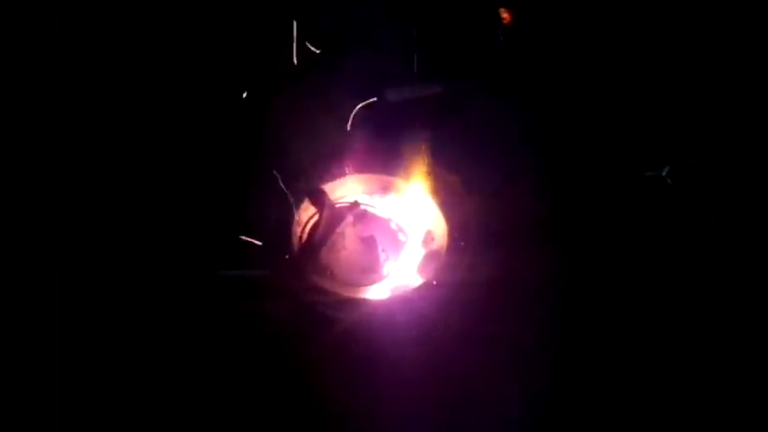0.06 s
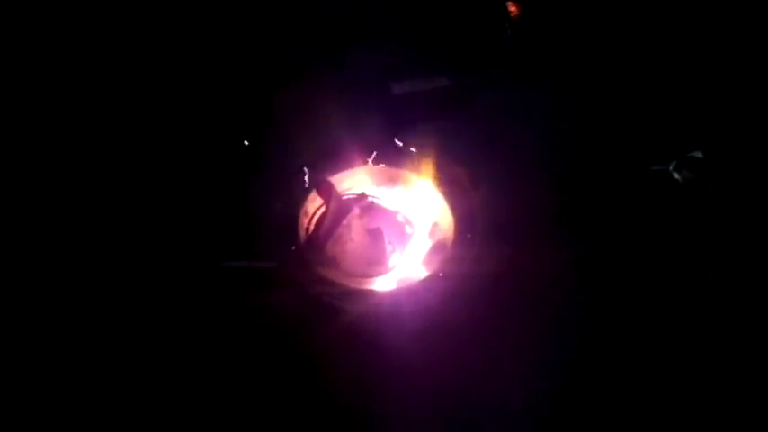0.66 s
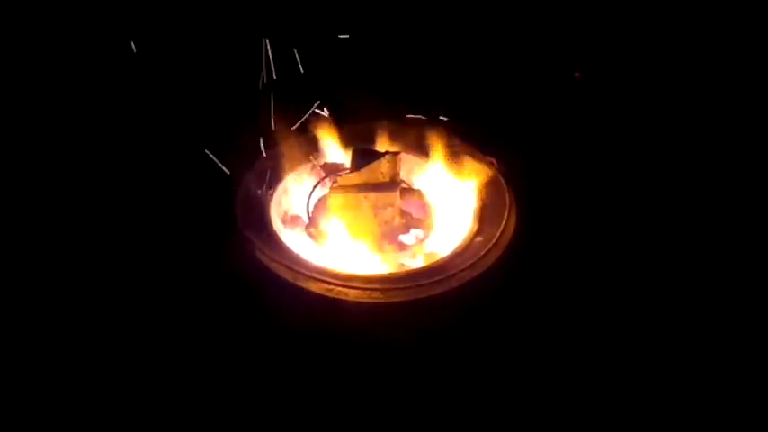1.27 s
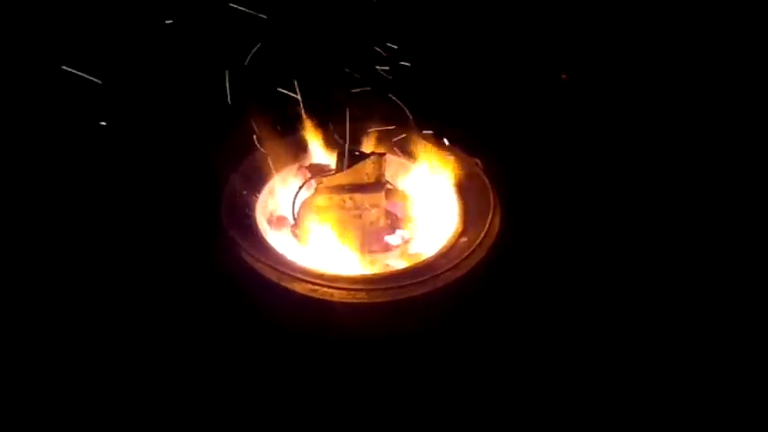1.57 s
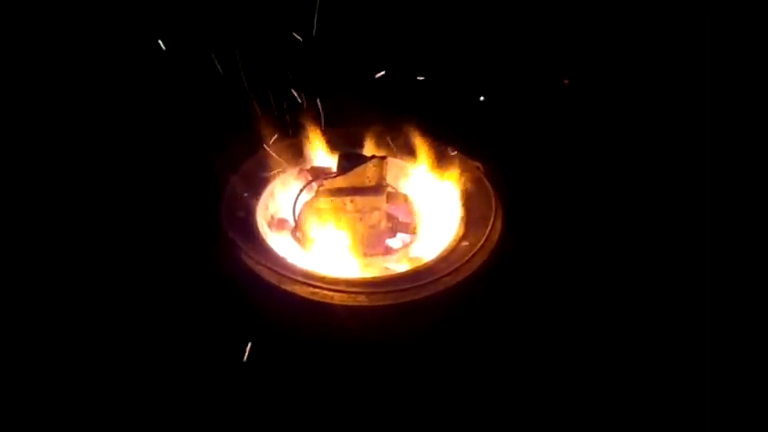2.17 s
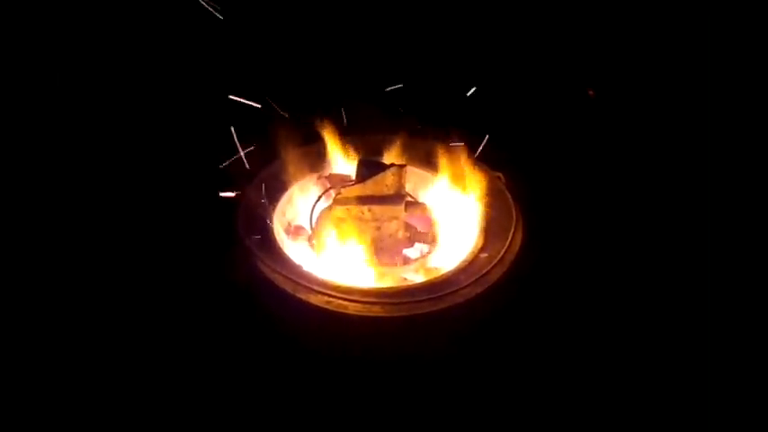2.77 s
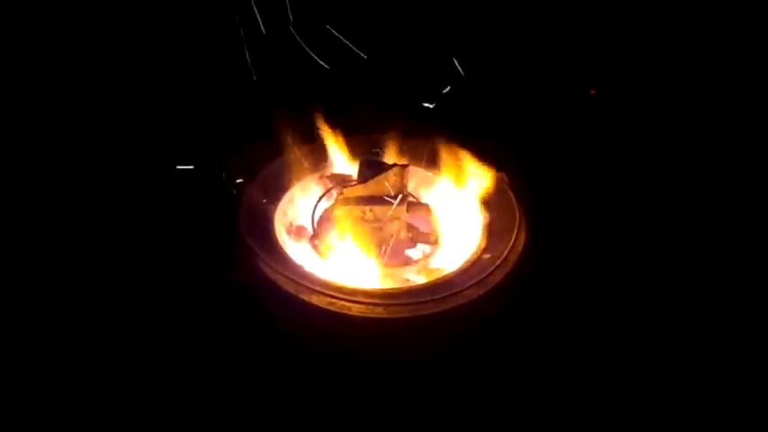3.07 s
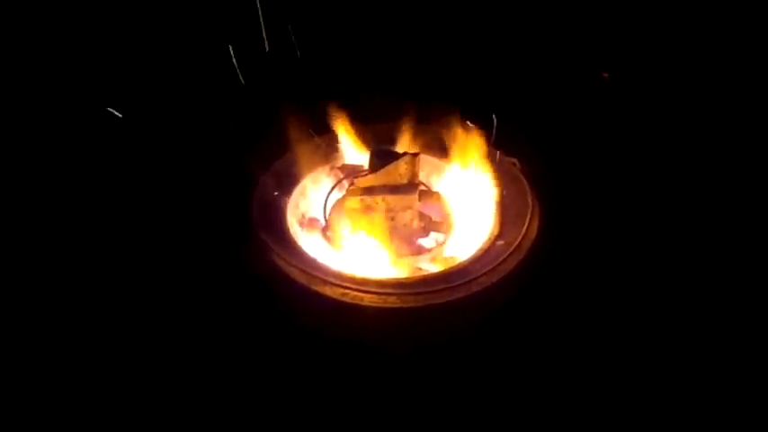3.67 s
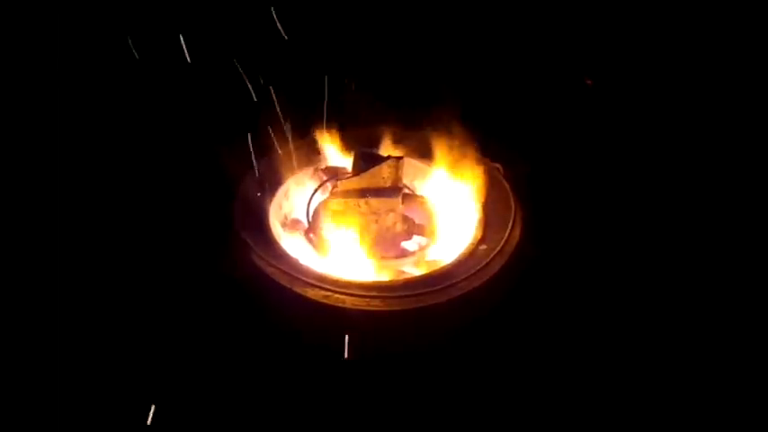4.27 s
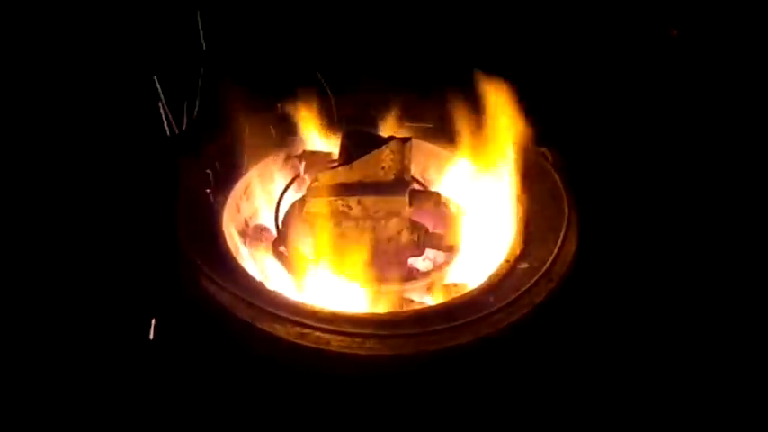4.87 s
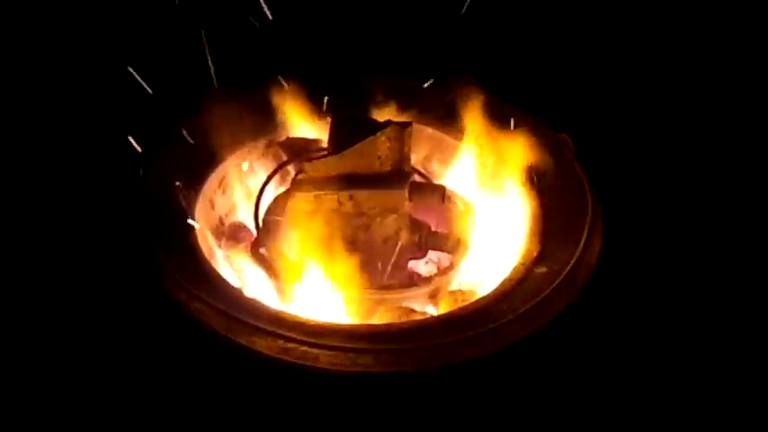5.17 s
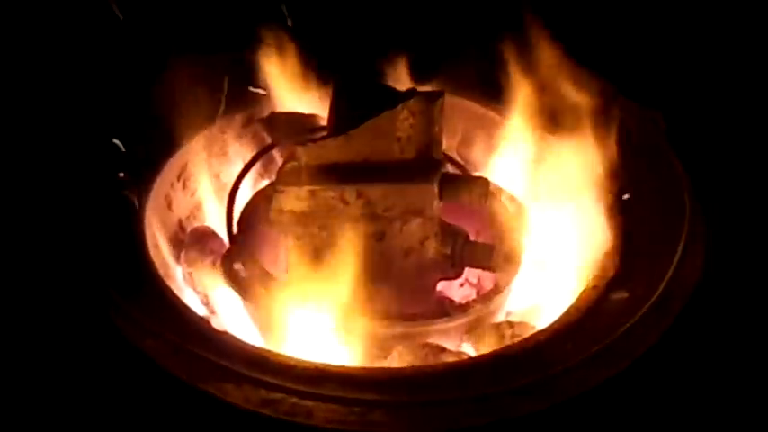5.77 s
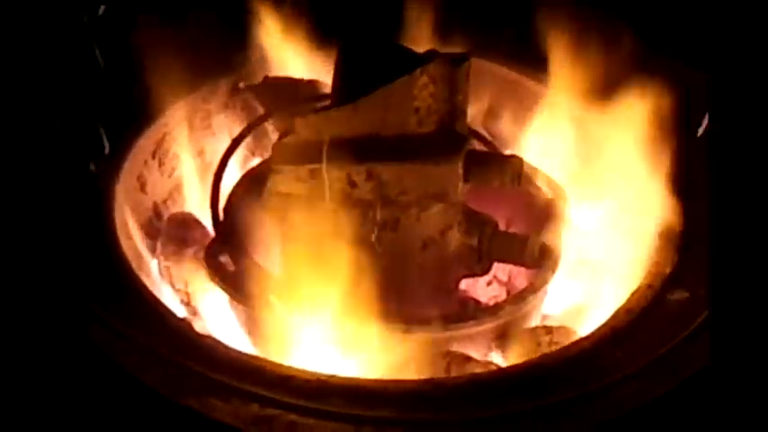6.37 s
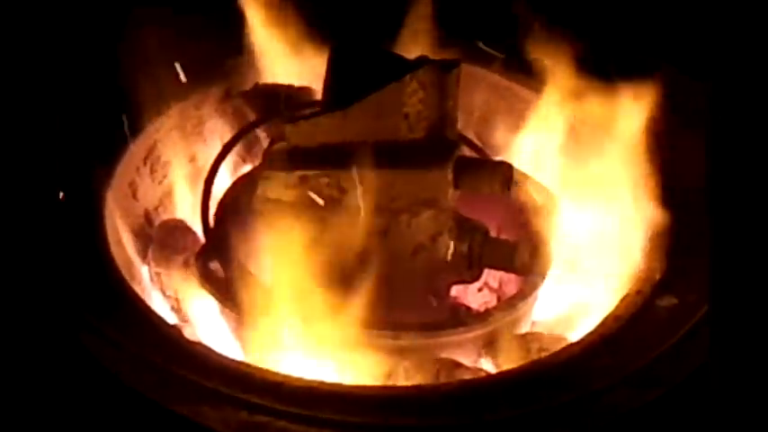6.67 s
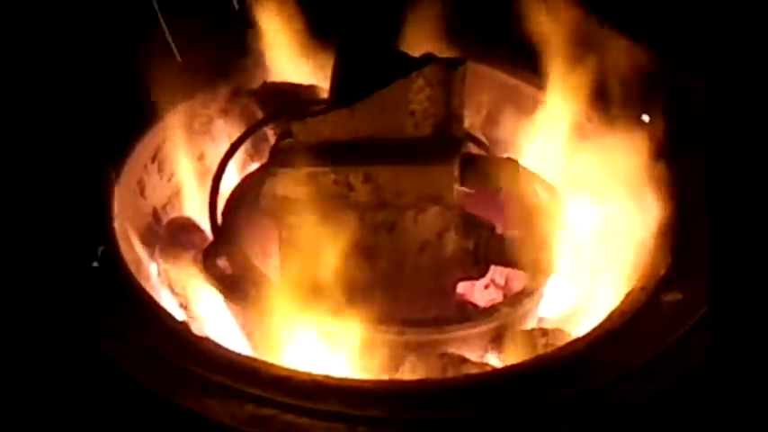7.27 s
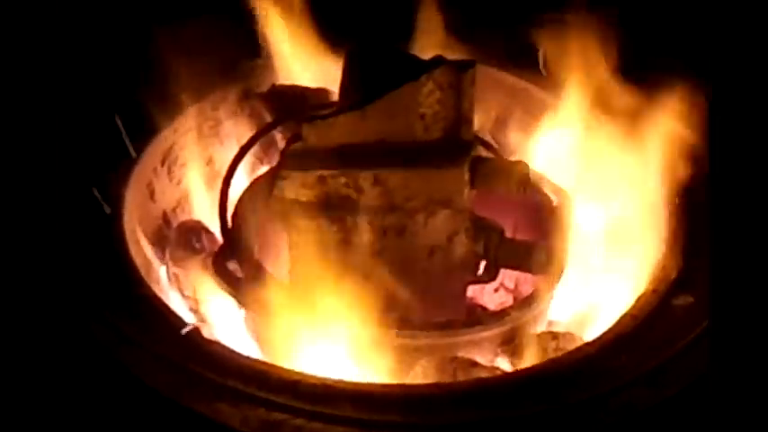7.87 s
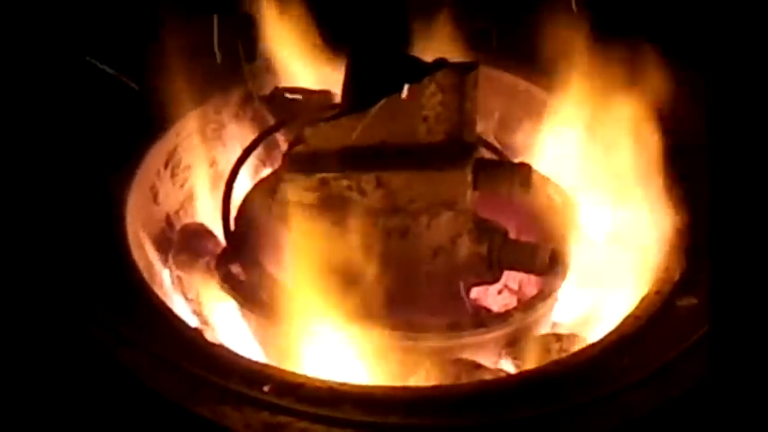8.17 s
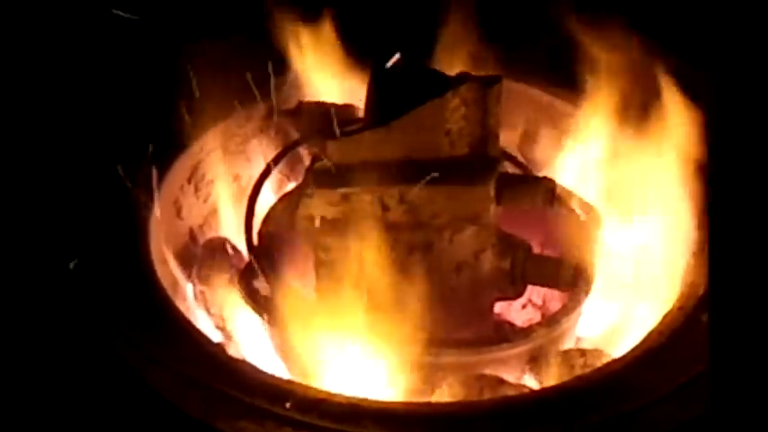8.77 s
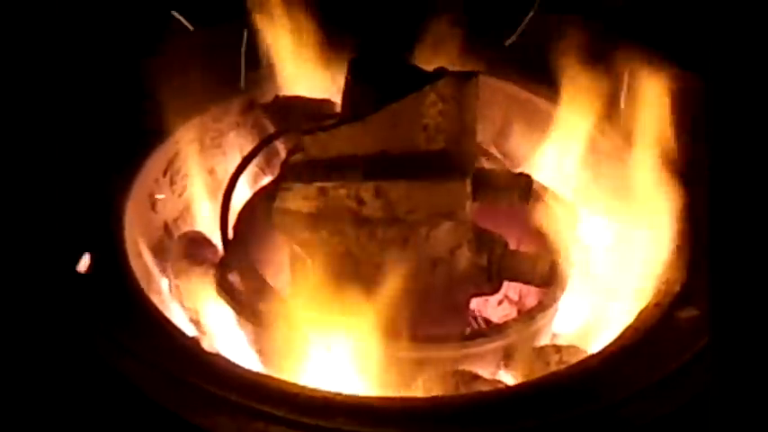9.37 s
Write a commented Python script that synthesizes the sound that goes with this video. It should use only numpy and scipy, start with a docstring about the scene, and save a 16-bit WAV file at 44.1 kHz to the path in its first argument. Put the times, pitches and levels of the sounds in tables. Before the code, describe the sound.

A homemade charcoal furnace roars outdoors, fed by an electric blower. At first it is a hissy rush with a faint whine, quickly fading and cutting to silence. It then fades back in from a second position, louder and fuller, with a strong, steady high whine over the rushing air. The coals give tiny ticks and a few sharp snaps, one clearly louder, while the motor hums faintly underneath.

```python
"""A homemade charcoal furnace roars outdoors at night, fed by a steady electric blower.
Turbulent air rushes through the pipe and the pot, the impeller whines over it,
the coals spit now and then, and the motor hums faintly underneath.
It is heard from two places: the first fades out, and after a silence the second fades in."""
import sys
import numpy as np
from scipy import signal
from scipy.fft import rfft, irfft, next_fast_len
from scipy.io import wavfile

SR = 44100
rng = np.random.default_rng(int(sys.argv[2]) if len(sys.argv) > 2 else 0)


def transcribe(signal):
    """Save signal, clipped to [-1, 1], as a 16-bit WAV file at the path in sys.argv[1]."""
    frames = np.atleast_2d(signal).T
    limited = np.clip(frames, -1, 1)
    pcm = np.round(limited * 32767).astype(np.int16)
    wavfile.write(sys.argv[1], SR, pcm)


N = 420713
TIME = np.arange(N) / SR


def blast(roar_db, hiss_db, spectrum, modes, flutter_db, waver_db, crossover_hz=2480):
    """Turbulent air in the pot and pipe: the flames flutter the roar, the jet's hiss wavers by itself."""
    air = colour(rng.standard_normal(N), spectrum, modes)
    roar = signal.sosfiltfilt(signal.butter(8, crossover_hz, fs=SR, output="sos"), air)
    hiss = air - roar
    return (rms_one(roar) * from_db(roar_db + flutter_db * drift(18))
            + rms_one(hiss) * from_db(hiss_db + waver_db * drift(9.8)))


def blower(whine_db, tones_db, wobble_hz=.7, shimmer_db=1.0):
    """Shaft and blade tones of the impeller; its speed wobbles and hot moving air makes them shimmer."""
    # impeller tones: multiple of the shaft rate
    shaft_orders = [1, 2, 7, 14, 21]
    blades, blade_hz, sag_hz_per_s = 7, 2094.5, .65
    shaft_hz = (blade_hz - sag_hz_per_s * TIME + wobble_hz * drift(3.8)) / blades
    angle = 2 * np.pi * np.cumsum(shaft_hz) / SR
    tones = sum(from_db(db + shimmer_db * drift(9.8)) * np.sin(order * angle)
                for order, db in zip(shaft_orders, tones_db))
    return np.sqrt(2) * from_db(whine_db) * tones


def coals(ticks_per_s=9, tick_db=-29, spread_db=4):
    """Bursting charcoal gives sharp, very short snaps: a few clear spits among many tiny ticks."""
    # clear spits: start_s, peak_db
    spits = [(2.4082, -22), (3.1046, -20), (3.1674, -16), (3.6583, -22), (3.9634, -6), (4.4620, -22),
             (5.3505, -22.5)]
    # ring of a bursting coal: pitch_hz, relative_db, t60_s
    coal_modes = [(1900, -2.5, .003), (3060, -1, 0.0028), (3700, -1.5, .003), (5000, -3.5, 0.0024),
                  (6940, 2, .003), (7400, -4, 0.0033)]
    ticks = rng.random(N) < ticks_per_s / SR
    bursts = ticks * from_db(tick_db + spread_db * np.clip(rng.standard_normal(N), -2, 2))
    for start_s, peak_db in spits:
        bursts[round(start_s * SR)] += from_db(peak_db)
    age = TIME[:SR // 100]
    snap = sum((-1) ** k * from_db(db) * np.exp(-np.log(1000) * age / t60) * np.sin(2 * np.pi * hz * age)
               for k, (hz, db, t60) in enumerate(coal_modes))
    return signal.fftconvolve(bursts, snap / np.abs(snap).max())[:N]


def motor_hum(pitch_hz=100, trim_db=-2.5, waver_db=1.8):
    """The motor's iron hums at twice the mains rate."""
    # level ride of the hum, before the trim: time_s, level_db
    hum_ride = [(2.1, -52), (2.75, -59), (5.11, -58), (8.77, -49), (9.4, -60)]
    level_db = in_time(hum_ride) + trim_db + waver_db * drift(3)
    return np.sqrt(2) * from_db(level_db) * np.sin(2 * np.pi * pitch_hz * TIME)


def first_place():
    """The furnace as a hissy roar with a faint whine."""
    # broad colour of the rushing air: frequency_hz, relative_db
    air = [(25, -41), (60, -33), (120, -23.5), (250, -19), (400, -8), (750, 0), (1100, -6), (2100, -7),
           (2420, -20.5), (3400, -11), (4600, -18.5), (6200, -18), (8000, -24.5)]
    # resonances and notches of the pot and pipe: centre_hz, width_hz, lift_db
    modes = [(214, 28, 5), (407, 70, 2.5), (600, 80, 2.5), (946, 80, 2), (1320, 210, 2.5), (1430, 120, 4),
             (1896, 170, 4), (3240, 500, 1), (4110, 400, -1), (5600, 550, 3)]
    # balance of the impeller tones, one per shaft order: relative_db
    tones_db = [-16, -12, -2, -1.5, -12]
    rush = blast(roar_db=-24.8, hiss_db=-33, spectrum=air, modes=modes, flutter_db=.2, waver_db=.9)
    return rush + blower(whine_db=-43, tones_db=tones_db)


def second_place(hiss_trim_db=3):
    """The furnace louder, with a strong blade tone, spitting coals and the motor's hum."""
    # broad colour of the rushing air: frequency_hz, relative_db
    air = [(25, -46), (50, -34), (100, -17), (250, -13.5), (370, -5), (700, 1.5), (1100, -6.5), (2130, -2),
           (2480, -17.5), (4300, -21), (6000, -19), (6600, -21.5), (8000, -22)]
    # resonances and notches of the pot and pipe: centre_hz, width_hz, lift_db
    modes = [(212, 40, 4), (253, 25, -3.5), (298, 30, 3), (383, 55, 2.5), (600, 90, 6.3), (925, 80, 4.5),
             (1222, 85, 4.7), (1475, 115, 4), (1665, 140, 4), (1820, 80, -1.5), (1970, 100, 2),
             (2360, 60, 3.5), (3030, 360, 4.7), (3500, 330, 4), (4300, 170, -3.3), (5520, 360, 5.5),
             (6020, 420, 4.2)]
    # level ride of the hiss, before the trim: time_s, level_db
    hiss_ride = [(2.55, -29.5), (2.85, -28), (3.73, -30), (4.59, -30.5), (5.6, -29), (9.34, -30),
                 (9.4, -30.5)]
    # balance of the impeller tones, one per shaft order: relative_db
    tones_db = [-27, -13, 0, -20.3, -18.8]
    hiss_db = in_time(hiss_ride) + hiss_trim_db
    rush = blast(roar_db=-19.5, hiss_db=hiss_db, spectrum=air, modes=modes, flutter_db=.26, waver_db=.4)
    return rush + blower(whine_db=-26.5, tones_db=tones_db) + motor_hum() + coals()


def fade_out(length_s=.92, cut_s=.668):
    """A straight fade, cut off before it reaches zero."""
    return np.maximum(1 - TIME / length_s, 0) * (TIME < cut_s)


def fade_in(start_s=1.508, length_s=1.16, end_s=9.6, start_gain=.022, curve=.66):
    """A fade that starts faint, rises fast, then more slowly, and holds."""
    progress = np.clip((TIME - start_s) / length_s, 0, 1)
    gain = start_gain + (1 - start_gain) * progress ** curve
    return gain * ((TIME >= start_s) & (TIME < end_s))


def colour(sound, spectrum, modes):
    """Pass a sound through a broad spectrum and a set of resonances; unit rms."""
    size = next_fast_len(N)
    hz = np.maximum(np.arange(size // 2 + 1) * SR / size, 1)
    points_hz, points_db = np.transpose(spectrum)
    db = np.interp(np.log(hz), np.log(points_hz), points_db)
    for centre_hz, width_hz, lift_db in modes:
        db += lift_db / (1 + ((hz - centre_hz) / width_hz) ** 2) ** 4
    return rms_one(irfft(rfft(sound, size) * from_db(db), size)[:N])


def drift(rate_hz):
    """A random wander of unit rms, mostly slower than rate_hz."""
    hz = np.arange(N // 2 + 1) * SR / N
    return rms_one(irfft(rfft(rng.standard_normal(N)) / (1 + (hz / rate_hz) ** 2), N))


def in_time(rows):
    """Join (time_s, value) rows by straight lines."""
    return np.interp(TIME, *np.transpose(rows))


def from_db(db):
    """Decibels to gain."""
    return 10 ** (np.asarray(db) / 20)


def rms_one(sound):
    """Scale to unit rms."""
    return sound / np.sqrt(np.mean(sound ** 2) + 1e-20)


def scene():
    """The same furnace from two places, one after the other, in mono."""
    return (first_place() * fade_out() + second_place() * fade_in())[None]


def record(dry):
    """A low-rate converter mirrors the treble about half its rate; smoothing and a steep cut follow."""
    converter_hz, cutoff_hz = 16000, 10100
    band_limited = signal.sosfilt(signal.ellip(12, .1, 80, converter_hz / 2, fs=SR, output="sos"), dry)
    mirrored = band_limited * (1 + 2 * np.cos(2 * np.pi * converter_hz * TIME))
    smoothed = signal.sosfilt(signal.butter(13, converter_hz / 2, fs=SR, output="sos"), mirrored)
    return signal.sosfilt(signal.ellip(10, .1, 90, cutoff_hz, fs=SR, output="sos"), smoothed)


dry = scene()
out = record(dry)
transcribe(out)
```